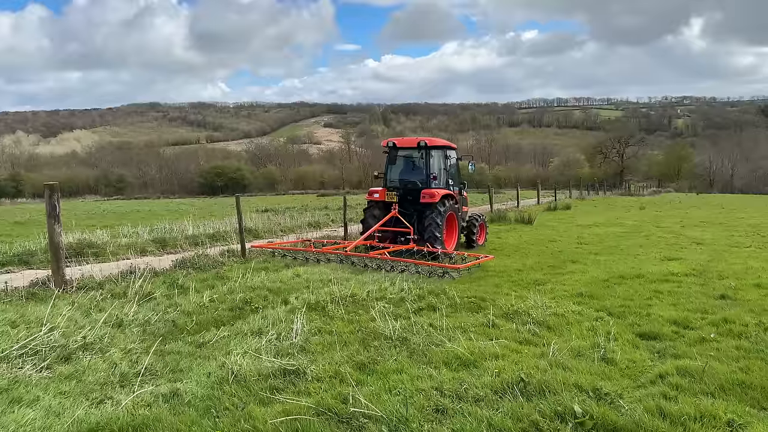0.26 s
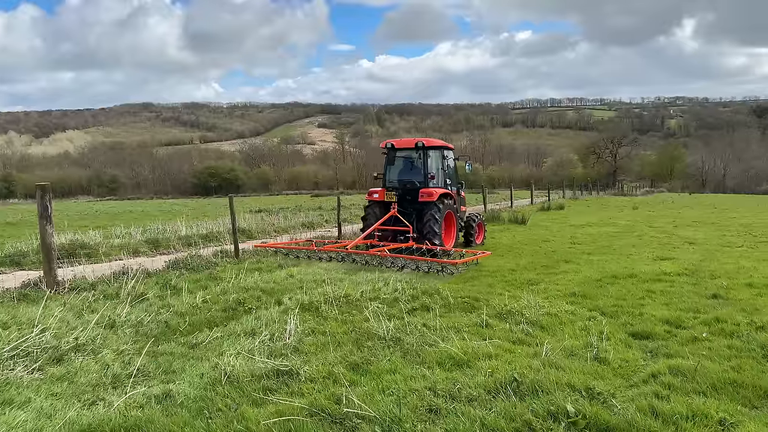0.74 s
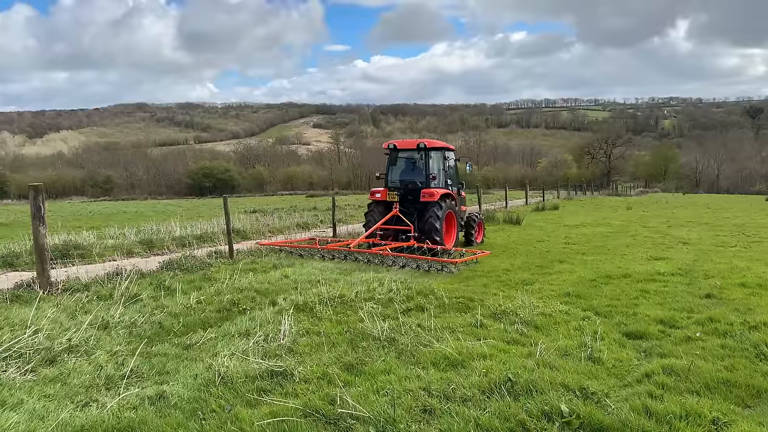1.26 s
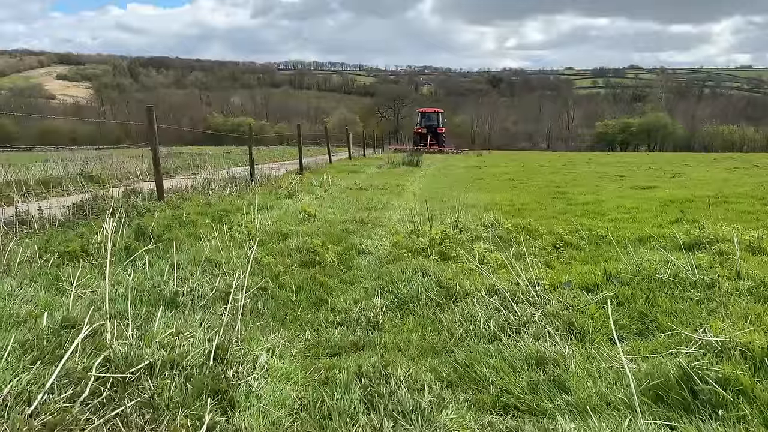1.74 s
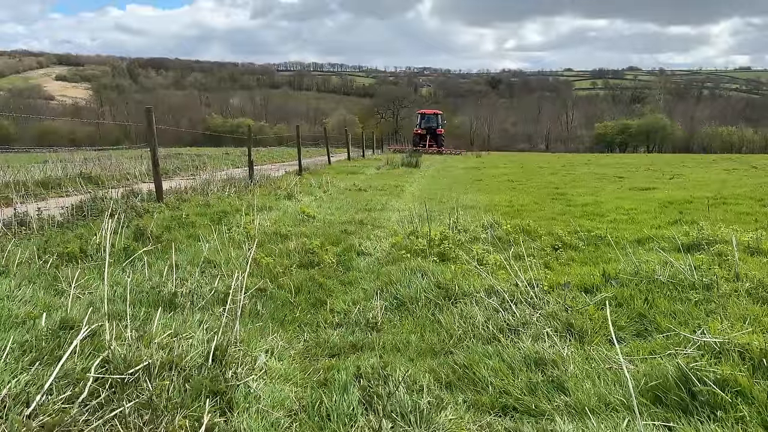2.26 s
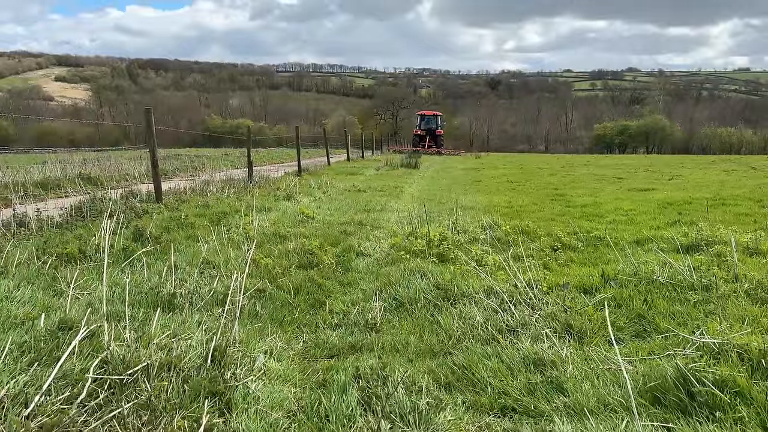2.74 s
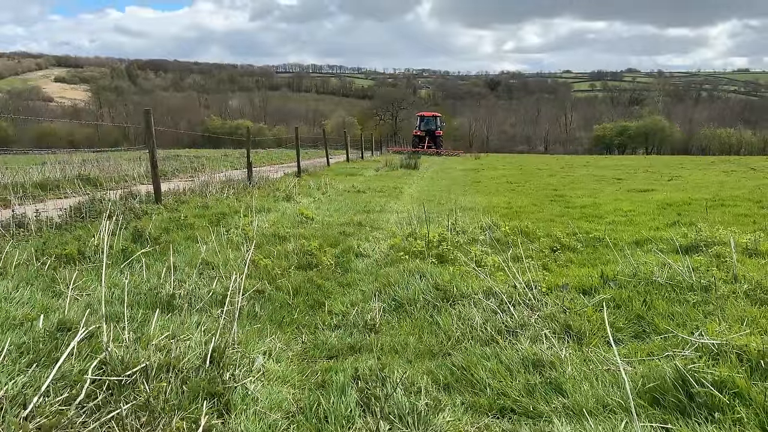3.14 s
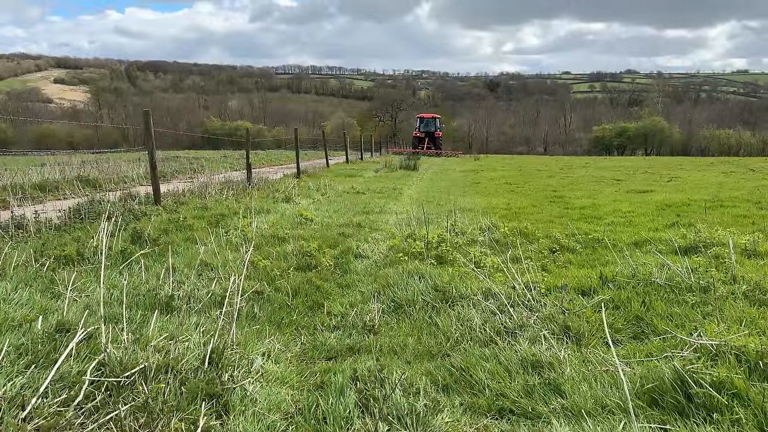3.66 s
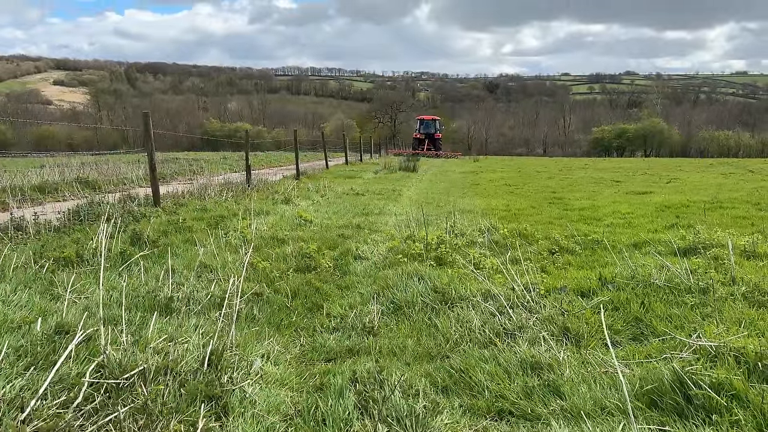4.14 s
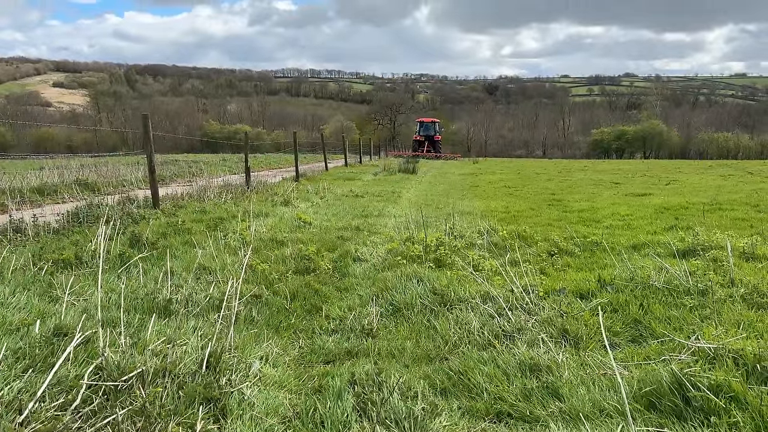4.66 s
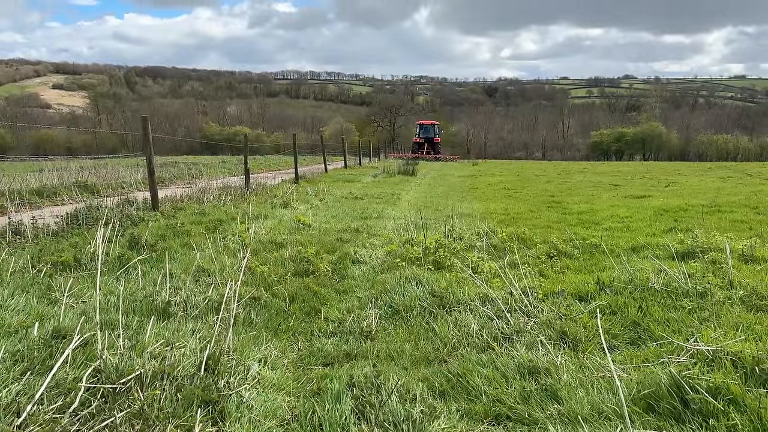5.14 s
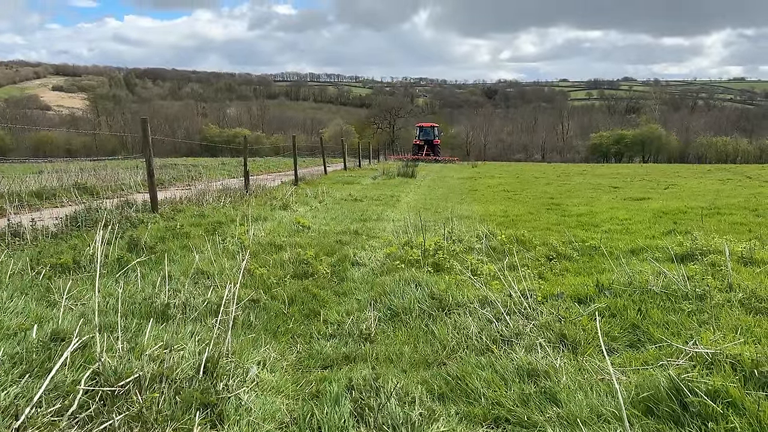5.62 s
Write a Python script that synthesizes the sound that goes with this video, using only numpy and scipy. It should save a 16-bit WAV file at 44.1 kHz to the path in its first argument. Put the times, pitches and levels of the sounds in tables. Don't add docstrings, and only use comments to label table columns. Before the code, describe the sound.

First a near tractor: deep rapid exhaust chug, rapping engine block, faint whine and sporadic harrow clanks. A hard cut moves the handheld microphone far behind it; the engine becomes a soft low purr under airy hiss and a light chain jingle. Wind buffets low, then bent bird notes come late in the dry open field.

```python
import sys
import numpy as np
from scipy import signal
from scipy.fft import rfft, irfft, next_fast_len
from scipy.io import wavfile
from scipy.ndimage import uniform_filter1d

SR = 44100
rng = np.random.default_rng(int(sys.argv[2]) if len(sys.argv) > 2 else 0)


def invert_db(level):
    return 10 ** (np.asarray(level, dtype=float) / 20)


def generate_wav(signal):
    frames = np.transpose(np.atleast_2d(signal))
    scaled = np.clip(frames, -1, 1) * 32767
    pcm = np.round(scaled).astype(np.int16)
    wavfile.write(sys.argv[1], SR, pcm)


N = 259782
CUT_S = 1.7375
HUM_ORDER, BOOM_ORDER = 16, 6
PUFF_AT = 0.165
BODY_FOLLOWS = 0.6

# (time [s], rate [cycles/s])
NEAR_ENGINE_SPEED = [(0, 13.7), (.49, 13.82), (.67, 13.74), (1.25, 13.9), (1.42, 13.84), (1.54, 13.92),
                     (1.64, 14.08), (1.74, 14.16)]
# (time [s], engine load [dB], shaking of the harrow [dB])
NEAR_LOAD = [(0, -1, 7.5), (.1, -0.5, 6), (.3, -1, 5.5), (.5, -1, 11), (.65, -2, 13), (.85, 2, 11.5),
             (1.2, -0.5, -8), (1.45, -3, -17), (1.63, 0.5, 15), (1.74, -6, -13)]
# (frequency [Hz], level [dB], t60 [s])
NEAR_LINK_MODES = [(4740, -0.5, 0.062), (5500, -3.5, 0.033), (6560, -2.5, 0.028), (7080, -4, 0.055),
                   (7560, 3, 0.054), (8000, 4, 0.032), (8700, -13, .04), (9500, -13, 0.064),
                   (10250, -1.5, 0.051), (11500, -15, .03), (13100, -21, .05)]
# (frequency [Hz], level [dB], t60 [s])
FAR_LINK_MODES = [(2494, -7, 0.054), (3050, -8, 0.054), (5720, -3, 0.044), (6445, 0, 0.034),
                  (7120, 0.5, 0.061), (7650, 3.5, 0.089), (7640, -5, 0.035), (8600, -15, .05),
                  (8980, 5.5, 0.06), (10250, -4.5, 0.067), (10530, -10.5, 0.092), (11400, -8, 0.049)]


def evened(x):
    return x / np.sqrt(np.mean(x ** 2) + 1e-20)


def read(points, hz, column=1):
    table = np.transpose(points)
    return np.interp(np.log(hz + 1), np.log(table[0] + 1), table[column])


def follow(t, points):
    return np.interp(t, *np.transpose(points))


def add(mix, s, sound):
    part = mix[..., round(s * SR):][..., :sound.shape[-1]]
    part += sound[..., :part.shape[-1]]


def drift(size, per_s):
    points = uniform_filter1d(rng.standard_normal(400), size=2)
    return evened(np.interp(np.arange(size) * per_s / SR, np.arange(400), points))


def step_down(t, s, fade_s):
    return 0.5 - 0.5 * np.tanh((t - s) / fade_s)


def band(x, lo_hz, hi_hz):
    return signal.sosfiltfilt(signal.butter(4, [lo_hz, hi_hz], "bandpass", fs=SR, output="sos"), x)


def level_in(x, lo_hz, hi_hz):
    return x / band(x, lo_hz, hi_hz).std()


def noise(size, colour, same, patchy_db, peaks=()):
    frames, hz = size // 256 + 5, np.fft.rfftfreq(1024, 1 / SR)
    a, b, c, d, patch = rng.standard_normal((frames, 513, 5)).T
    patch = uniform_filter1d(uniform_filter1d(patch, size=10, axis=0), size=10, axis=1)
    patch = evened(patch)
    lift = np.ones(513)
    for f, width, db in peaks:
        lift += invert_db(db) ** 2 / (1 + (2 * (hz - f) / width) ** 2)
    like = np.clip(read(same, hz), 0, 1)[:, None]
    left = a + 1j * b
    right = like * left + np.sqrt(1 - like ** 2) * (c + 1j * d)
    z = np.array([left, right])
    z *= invert_db(read(colour, hz)[:, None] + patchy_db * patch) * np.sqrt(lift)[:, None]
    return signal.istft(z, nperseg=1024, noverlap=768)[1][:, :size]


def low_noise(size, colour):
    even = size + size % 2
    spectrum = rfft(rng.standard_normal(even)) * invert_db(read(colour, np.fft.rfftfreq(even, 1 / SR)))
    return evened(irfft(spectrum)[:size])


def curves(speed, rows, size, start):
    t = start + np.arange(size) / SR
    s, *columns = np.transpose(rows)
    turns = np.cumsum(follow(t, speed)) / SR
    return t, turns, *(np.interp(t, s, c) for c in columns)


def exhaust(turns, orders, rumble, bass_db, body_db, rumble_db, waver, scatter):
    size = len(turns)
    tones = np.zeros(size)
    for k, db in orders:
        if k in (HUM_ORDER, BOOM_ORDER):
            continue
        place = turns - PUFF_AT + scatter * (k % 3 > 0) * rng.standard_normal()
        level = invert_db(db) * (1 + waver * drift(size, 5.31))
        tones += level * np.cos(2 * np.pi * k * place + waver * drift(size, 3.73))
    x = evened(tones) + invert_db(rumble_db) * low_noise(size, rumble)
    bass, body = evened(band(x, 19, 216.0)), evened(band(x, 219.2, 544))
    return invert_db(bass_db) * bass + invert_db(body_db) * body


def hum(t, rows):
    s, hz, db = np.transpose(rows)
    pitch = uniform_filter1d(np.interp(t, s, hz), size=4000)
    return np.sqrt(2) * invert_db(np.interp(t, s, db)) * np.sin(2 * np.pi * np.cumsum(pitch) / SR)


def boom(t, turns, rows):
    return np.sqrt(2) * invert_db(follow(t, rows)) * np.cos(2 * np.pi * BOOM_ORDER * (turns - PUFF_AT))


def clatter(turns, colour, block, same, knock, decay, uneven_db, lo_hz, hi_hz):
    firing = 3 * turns
    count = firing.astype(int)
    strength = invert_db(uneven_db * (rng.standard_normal(400)[count] + (count % 3 == 0)))
    gate = 1 + knock * strength * np.exp(-uniform_filter1d(firing % 1, size=40) / decay)
    return level_in(noise(len(turns), colour, same, patchy_db=0.74, peaks=block) * gate, lo_hz, hi_hz)


def whine(turns, lines):
    out, size = np.zeros(len(turns)), len(turns)
    for k, db, wobble in lines:
        level = np.sqrt(2) * invert_db(db) * (1 + wobble * drift(size, 11.13))
        out += level * np.cos(2 * np.pi * round(k) * turns + wobble * drift(size, 20.0))
    return out


def ring(links, weights, detune=1):
    t = np.arange(6000) / SR
    modes = np.zeros(6000)
    for (hz, db, t60), w, d in zip(links, weights, detune * np.ones(len(links))):
        modes += w * invert_db(db - 60 * t / t60) * np.sin(2 * np.pi * hz * d * t)
    return (1 - np.exp(-t / 0.0015)) * modes


def chain(turns, links, shakes, per_s, spread_db, tight, tick_db, restless_db, unlike):
    size = len(turns)
    odds = (1 + np.cos(2 * np.pi * shakes * turns)) ** tight * invert_db(2.5 * drift(size, 12.0))
    struck = rng.random(size) < odds / odds.mean() * per_s / SR
    hits = struck * invert_db(spread_db * np.minimum(rng.exponential(1, size), 4))
    which, out = rng.integers(0, 8, size), np.zeros(size)
    for k in range(8):
        weights = rng.standard_normal(len(links))
        sound = ring(links, weights, 1 + unlike * rng.standard_normal(len(links)))
        tick = band(rng.standard_normal(600), 5000, 15500) * np.exp(-np.arange(600) / 90)
        sound[:600] += invert_db(tick_db) * tick
        own_hits = hits * (which == k) * invert_db(restless_db * drift(size, 2.7))
        out += signal.oaconvolve(own_hits, sound)[:size]
    return level_in(out, 5430, 7550)


def piston(t, turns):
    # (frequency [Hz], level [dB], t60 [s])
    modes = [(1795, 0, .07), (1850, -2, .06), (1915, -3, .06), (2520, -12, .02), (3300, -15, .012)]
    # (place in the cycle [0-1], level [dB])
    raps = [(.05, -2), (.3, -4), (.39, 0), (.58, -1), (.73, -5)]
    # (time [s], level [dB])
    rap_level = [(0, -2.5), (.3, 0), (.45, -3.5), (.68, 1.5), (.78, -6.5), (.95, -1), (1.74, -2.5)]
    jitter_s, uneven_db = 0.00043, 1.5
    blows = np.zeros(len(turns))
    for place, db in raps:
        struck = np.flatnonzero(np.diff(np.floor(turns - place)))
        late, hard = rng.standard_normal((len(struck), 2)).T
        at = np.clip(struck + (late * jitter_s * SR).astype(int), 0, len(turns) - 1)
        blows[at] = invert_db(db + uneven_db * hard)
    rung = evened(signal.oaconvolve(blows, ring(modes, np.ones(len(modes))))[:len(turns)])
    return invert_db(-47 + follow(t, rap_level)) * rung


def near_tractor(size):
    # (multiple of the engine cycle, level [dB])
    orders = [(1, -38), (2, -41), (3, -5.5), (4, -20), (5, -10), (6, 3.5), (7, -22.5), (8, -11), (9, 0.5),
              (10, -3.5), (11, 0), (12, -4), (13, -14.5), (14, -15), (15, -2.5), (16, -3), (17, -14),
              (18, -11.5), (19, -15.5), (20, -13.5), (21, -19.5), (22, -12.5), (23, -18), (24, -11.5),
              (25, -22), (26, -28.5), (27, -18.5), (28, -29), (29, -28), (30, -29)]
    # (frequency [Hz], density [dB per Hz])
    rumble = [(22, -53), (38, -23), (134, -3), (188, 1), (219, -8), (259, -30), (325, -18.5), (413, -14.5),
              (620, -19), (810, -53), (1360, -120)]
    # (frequency [Hz], density [dB per Hz])
    colour = [(450, -3.5), (620, 2), (1000, 1.5), (1500, -1.5), (2200, -8.5), (3200, -10), (4600, -19),
              (7600, -18), (9200, -21.5), (10500, -20), (13000, -27.5), (15600, -30), (16000, -82)]
    # (frequency [Hz], width [Hz], level [dB])
    block = [(1814, 120, -6), (1930, 46, -4), (2520, 290, 1), (3890, 300, -1.5)]
    # (frequency [Hz], likeness [0-1])
    same = [(500, 0.98), (900, 0.89), (1300, 0.97), (1800, 0.93), (3500, 0.88), (5500, 0.7), (9200, 1),
            (10500, 1), (13000, 0.8), (16000, .7)]
    # (multiple of the engine cycle, level [dB], wobble [0-1])
    teeth = [(48, -44.5, .1), (54, -63, .4), (72, -58, .4), (96, -64, .5), (140, -64, .4)]
    # (time [s], frequency [Hz], level [dB])
    hum_curve = [(0.0, 227.5, -34), (0.092, 222.7, -40.5), (0.304, 224.2, -42.5), (0.474, 224.0, -35.5),
                 (0.654, 224.0, -44.5), (0.828, 222.9, -37.5), (1.638, 226.5, -41.5), (1.73, 227.1, -35.5),
                 (1.74, 226.6, -54)]
    # (time [s], level [dB])
    boom_curve = [(0.0, -35), (0.028, -40.5), (0.998, -39.5), (1.066, -34), (1.152, -40), (1.196, -40),
                  (1.696, -39), (1.74, -39)]
    # (frequency [Hz], lag [half turns], left-right difference [dB])
    bend = [(600, 0, 0), (800, -.03, 3.5), (1200, -.23, 3), (1500, -.08, 1), (1800, 0, 0)]
    bass_db, body_db, clatter_db, chain_db = -33, -41.5, -44.5, -73.5
    t, turns, load_db, shake_db = curves(NEAR_ENGINE_SPEED, NEAR_LOAD, size, 0)
    x = invert_db(clatter_db + 0.051 * load_db) * clatter(
        turns + 0.283, colour, block, same, knock=0.35, decay=0.4, uneven_db=1.2, lo_hz=1060, hi_hz=3960)
    x += exhaust(turns, orders, rumble, bass_db + load_db, body_db + BODY_FOLLOWS * load_db,
                 rumble_db=-4.5, waver=0.36, scatter=0.016)
    x += whine(turns, teeth) + hum(t, hum_curve) + boom(t, turns, boom_curve)
    x += invert_db(chain_db + shake_db) * chain(
        turns + 0.12, NEAR_LINK_MODES, 0.73, per_s=110, spread_db=0.5, tight=4.4,
        tick_db=4.5, restless_db=4.0, unlike=0.048)
    x += piston(t, turns)
    hz = np.fft.rfftfreq(size, 1 / SR)
    path = invert_db(-read(bend, hz, column=2)) * np.exp(-1j * np.pi * read(bend, hz))
    x[1] = irfft(rfft(x[1]) * path, size)
    return x


def valves(size):
    # (place in the cycle [0-1], low edge [Hz], high edge [Hz], level [dB])
    snaps = [
        (.255, 2200, 4500, -49),
        (.59, 2600, 4500, -48.5),
        (.69, 2200, 3200, -54),
        (.7, 4500, 7600, -54.5),
        (.66, 1000, 1600, -48),
        (.96, 1000, 1600, -48),
    ]
    decay_s, uneven_db = 0.0045, 2.5
    t, turns, load_db, shake_db = curves(NEAR_ENGINE_SPEED, NEAR_LOAD, size, 0)
    out = np.zeros(size)
    for place, lo_hz, hi_hz, db in snaps:
        since_s = (turns - place) % 1 / follow(t, NEAR_ENGINE_SPEED)
        hard_db = uneven_db * rng.standard_normal(40)[np.floor(turns - place).astype(int)]
        fade = uniform_filter1d(np.exp(-since_s / decay_s), size=30)
        out += invert_db(db + hard_db) * fade * evened(band(rng.standard_normal(size), lo_hz, hi_hz))
    return out


def wind():
    # (frequency [Hz], density [dB per Hz])
    colour = [(24, -45), (38, -8), (55, 0), (100, 0), (200, -14), (330, -28), (500, -50)]
    # (time [s], level [dB])
    strength = [(0, -67.5), (1.73, -54), (1.8, -49), (2.2, -64), (2.8, -55), (3.2, -55), (3.5, -69),
                (3.8, -61.5), (4.6, -56), (5.2, -59.5), (5.89, -59)]
    # (time [s], level [dB], frequency [Hz], length [s])
    bumps = [
        (1.876, -38, 75, 0.038),
        (3.993, -18.5, 92, 0.01),
        (4.005, -20, 70.3, 0.036),
        (4.516, -37, 79.6, 0.024),
        (4.581, -32.5, 76.7, 0.045),
        (5.827, -24, 66, 0.016),
    ]
    out = np.array([low_noise(N, colour) * invert_db(0.8 * drift(N, 13.0)) for port in "LR"])
    out *= invert_db(follow(np.arange(N) / SR, strength) + 4)
    for s, db, hz, length in bumps:
        t = np.arange(0, length, 1 / SR)
        swing = np.sin(np.pi * t / length) ** 0.65 * np.sin(2 * np.pi * hz * t + 2.9)
        add(out, s, invert_db(db) * np.outer([1.15, 0.85], swing))
    return out


def clinks(mix):
    # (time [s], frequency [Hz], level [dB])
    near_links = [(.075, 8250, -58), (.09, 7900, -53), (.2, 10300, -54), (.2, 7650, -60), (.515, 8100, -62),
                  (.705, 7850, -57), (.705, 10200, -54), (.775, 8700, -61), (.78, 13100, -62),
                  (.9, 10250, -57), (.92, 7900, -47), (1.29, 7700, -65), (1.512, 9740, -43.5),
                  (1.644, 8060, -46)]
    # (time [s], level [dB])
    far_ticks = [(1.7708, -72), (1.8471, -65), (1.9229, -65), (2.0586, -72), (2.1734, -67), (2.328, -67),
                 (2.3786, -77), (2.4188, -67), (2.6154, -72), (2.768, -72), (2.8977, -70), (3.1127, -69),
                 (3.2804, -63), (3.4859, -79), (3.5926, -75), (3.6291, -75), (3.6804, -70), (3.7423, -79),
                 (3.8067, -72), (3.88, -75), (3.9329, -64), (4.077, -66), (4.1319, -68), (4.2536, -68),
                 (4.3858, -73), (4.4617, -72), (4.6178, -77), (4.6477, -78), (4.7096, -78), (4.7445, -72),
                 (4.8084, -67), (4.8727, -74), (4.9032, -69), (4.9371, -70), (5.0867, -70), (5.2274, -72),
                 (5.2858, -76), (5.3132, -68), (5.7926, -77), (5.8096, -65)]
    t60_s, tick_lift_db, tick_s = 0.076, 1.5, 0.003
    for s, hz, db in near_links:
        add(mix, s, ring([(hz, db, t60_s), (hz * 0.7, db - 3, t60_s)], [1, 1]))
    fade = np.exp(-np.arange(1500) / SR / tick_s)
    puffs = band(rng.standard_normal((len(far_ticks), 1500)), 8000, 15600)
    for (s, db), puff in zip(far_ticks, puffs):
        add(mix, s, invert_db(db + tick_lift_db) * puff * fade)


def knocks(mix):
    # (time [s], level [dB], ring share [0-1])
    strikes = [(0.5186, -48, 0.6), (0.692, -50, 0.3), (0.7943, -47, 0.1), (1.0774, -67, 0.4),
               (1.512, -40, 0.05), (2.1876, -61, 0.3), (2.3281, -70, 0.3), (2.38, -59, 0.5),
               (2.42, -60, 0.2), (2.615, -65, 0.4), (2.895, -52, 0.6), (3.114, -60, 0.2),
               (3.6805, -65, 0.2), (3.939, -57, 0.6), (4.2627, -56, 0.4), (4.9367, -71, 0.5),
               (5.301, -58, 0.6)]
    t = np.arange(3000) / SR
    fade = (1 - np.exp(-t / 0.0011)) * (np.exp(-t / 0.0037) + invert_db(-8) * np.exp(-t / 0.02))
    for s, db, share in strikes:
        links = NEAR_LINK_MODES if s < CUT_S else FAR_LINK_MODES
        sound = share * 0.38 * ring(links, rng.standard_normal(len(links)))
        spray = rng.standard_normal(3000)
        sound[:3000] += (band(spray, 5500, 11500) + invert_db(-4) * band(spray, 11500, 15600)) * fade
        add(mix, s - 0.001, invert_db(db + 2.5) * sound)


def drawbar(t, turns):
    # (start [s], length [s], frequency [Hz], level [dB])
    rough_ground = [(1.6, .4, 1430, -84), (1.6, 0.45, 6250, -68), (1.6, 0.37, 5500, -70),
                    (1.6, 0.74, 7120, -78), (1.6, 0.62, 8000, -69), (1.6, .75, 8980, -75),
                    (2.2, .7, 5900, -78), (2.3, 1, 5700, -77), (2.55, .5, 5500, -77), (2.4, .55, 7100, -76),
                    (3, 1.4, 1487, -74), (3.15, .95, 3030, -69), (3.2, .75, 2530, -74),
                    (3.22, 1.3, 5940, -66), (3.22, .9, 4830, -73), (3.22, .75, 7000, -73),
                    (3.2, 2.35, 8980, -75), (3.9, .8, 6270, -70), (4.15, .5, 8000, -75),
                    (4.292, 0.85, 5800, -71), (5.35, 0.35, 4770, -75), (4.398, 1.26, 6980, -75.5),
                    (4.751, 0.44, 6200, -70), (4.846, 0.87, 5890, -70), (4.851, 1, 2974, -73.5),
                    (2.411, 0.39, 10250, -85), (3.101, 1.3, 10100, -75), (4.606, 0.81, 10040, -81)]
    t60_s, edge, spread, wander = 0.11, 0.2, 0.008, 0.003
    odds = (1 + np.cos(4 * np.pi * (turns + 0.1))) * 1500 / SR
    out = np.zeros(len(t))
    decay = np.exp(-np.log(1000) / t60_s / SR)
    for s, length, hz, db in rough_ground:
        on = (t > s) & (t < s + length)
        size = on.sum()
        taps = (rng.random(size) < odds[on]) * rng.standard_normal(size)
        angle = 2j * np.pi * np.cumsum(hz * (1 + wander * drift(size, 3.9))) / SR
        sung = np.zeros(size)
        for turn, w in [(np.exp(angle), 1), (np.exp((1 + spread) * angle), 0.5)]:
            sung += w * (turn * signal.lfilter([1], [1, -decay], taps * turn.conj())).real
        out[on] += invert_db(db) * np.sin(np.pi * (t[on] - s) / length) ** edge * evened(sung)
    return out


def far_tractor(size):
    # (time [s], rate [cycles/s])
    speed = [(1.74, 15.7), (2.8, 15.58), (3.8, 15.54), (4.2, 15.62), (4.8, 15.64), (5.2, 15.55),
             (5.89, 15.52)]
    # (time [s], engine load [dB], shaking of the harrow [dB], treble carried by the air [dB])
    work = [(1.74, 8, 2.5, 3.5), (2.1, -1, 0, 2.5), (2.25, 0, 5.5, 1), (2.31, -0.5, -10, -0.5),
            (2.37, 1.5, -2, 2), (2.6, 1, -3.5, 0.5), (2.9, -0.5, 1, 2.5), (3.15, 1, -1.5, 1.5),
            (3.5, -1, 0, 2), (3.9, 1, 1, 2.5), (4.25, -0.5, 0, 2.3), (4.55, 0.5, 0.5, 0.5), (5, -1, 5, 1),
            (5.3, -2.5, -1, -0.5), (5.53, -0.5, -3.5, 0.4), (5.6, -3, -8.5, -1), (5.72, -2.5, 1, -0.5),
            (5.89, 0.5, -9.5, -1.5)]
    # (multiple of the engine cycle, level [dB])
    orders = [(1, -44.5), (2, -25), (3, -8.5), (4, -7.5), (5, -20.5), (6, 0), (7, -2.5), (8, -9.5),
              (9, -1.5), (10, 1), (11, -4), (12, -4.5), (13, -6.5), (14, -17), (15, -14.5), (16, -4),
              (17, -19), (18, -12), (19, -15), (20, -24.5), (21, -31.5), (22, -22.5), (23, -23), (24, -10),
              (25, -20.5), (26, -16), (27, -19), (28, -22.5), (29, -17.5), (30, -22), (31, -26.5),
              (32, -28)]
    # (frequency [Hz], density [dB per Hz])
    rumble = [(22, -58), (40, -25), (146, -5.5), (196, -0.5), (219, -15.5), (243, -12.5), (276, -17.5),
              (378, -13), (620, -18.5), (810, -57.5), (1360, -120)]
    # (frequency [Hz], density [dB per Hz])
    colour = [(450, -3), (620, 2.5), (1000, -1), (1400, -7), (2200, -7.5), (3400, -9.5), (4500, -15.5),
              (6000, -10.5), (8000, -25.5), (10000, -19.5), (11500, -25.5), (12800, -30), (15600, -53),
              (16000, -81)]
    # (frequency [Hz], width [Hz], level [dB])
    block = [(1450, 48, 3.5), (3020, 34, 2), (2500, 33, -20)]
    # (frequency [Hz], likeness [0-1])
    same = [(500, 0.39), (750, 0.21), (1100, 0.053), (1500, 0.82), (1900, 0.89), (3500, 0.82), (5500, 0.58),
            (9200, 0.84), (10500, 0.84), (13000, 0.44), (16000, .7)]
    # (multiple of the engine cycle, level [dB], wobble [0-1])
    teeth = [(36, -70, 0.38), (48, -66.5, 0.15)]
    # (time [s], frequency [Hz], level [dB])
    hum_curve = [(1.76, 248.2, -47), (1.77, 248.7, -48), (1.94, 251.1, -57), (2.18, 251.5, -47),
                 (2.71, 251.8, -45.5), (2.93, 250.5, -50.5), (3.29, 249.6, -46), (3.47, 249.6, -50),
                 (3.74, 249.9, -45.5), (4.52, 252.4, -48.5), (4.8, 252.2, -44.5), (5.08, 251.9, -52.5),
                 (5.27, 250.9, -45), (5.76, 251.0, -50), (5.88, 248.4, -47), (5.89, 248.2, -40)]
    # (time [s], level [dB])
    boom_curve = [(1.76, -57), (1.78, -70), (1.9, -46), (1.98, -67), (2.01, -53), (2.22, -63), (2.36, -48),
                  (2.43, -57), (2.64, -42.5), (3.27, -47), (3.97, -44), (4.01, -38), (4.08, -43.5),
                  (5.57, -46), (5.85, -40.5), (5.89, -51)]
    bass_db, body_db, clatter_db, chain_db = -38.5, -48.5, -65, -70
    t, turns, load_db, shake_db, carry_db = curves(speed, work, size, CUT_S)
    x = invert_db(clatter_db + carry_db) * clatter(
        turns + 0.1, colour, block, same, knock=0.5, decay=0.45, uneven_db=1.5, lo_hz=855, hi_hz=1880)
    treble_db = 0.38 * carry_db + 1.9 * drift(size, 11.15)
    x += (invert_db(treble_db) - 1) * band(x, 4000, 16000)
    bass_db = bass_db + load_db - 11.5 * step_down(t, 2.18, 0.02)
    body_db = body_db + BODY_FOLLOWS * load_db - 3 * step_down(t, 1.91, 0.12)
    pipe = exhaust(turns, orders, rumble, bass_db, body_db, rumble_db=-3.5, waver=0.28, scatter=0.102)
    pipe += hum(t, hum_curve)
    x += pipe + (invert_db(-6.5 * step_down(t, 2.63, 0.13)) - 1) * band(pipe, 13, 148)
    x += boom(t, turns, boom_curve)
    x += invert_db(-5 * step_down(t, 3.5, 0.088)) * whine(turns, teeth)
    x += invert_db(chain_db + shake_db) * chain(
        turns + 0.1, FAR_LINK_MODES, 2, per_s=700, spread_db=2.0, tight=1.3,
        tick_db=-2, restless_db=2.0, unlike=0.006)
    x += drawbar(t, turns)
    gust_db = 5 * (drift(size, 10.0) - 1) + 0.8 * shake_db
    return x + (invert_db(gust_db) - 1) * band(x, 11800, 16000)


def whistle(mix, start, hz, level, sides):
    level = level * (1 + 0.17 * drift(len(hz), 60))
    add(mix, start, np.outer(sides, np.sqrt(2) * level * np.sin(2 * np.pi * np.cumsum(hz) / SR)))


def long_note(rows):
    s, hz, db = np.transpose(rows)
    t = np.arange(s[0], s[-1], 1 / SR)
    ends = np.clip(np.minimum(t - s[0], s[-1] - t) / 0.006, 0, 1)
    return s[0], uniform_filter1d(np.interp(t, s, hz), size=200), invert_db(np.interp(t, s, db)) * ends


def arch(start, length, first_hz, last_hz, db):
    u = np.arange(0, length, 1 / SR) / length
    bow = np.sin(np.pi * u ** 0.86)
    hz = (first_hz + (last_hz - first_hz) * u) * (1 + 0.14 * bow ** 0.47)
    return start, hz, invert_db(db) * np.sin(np.pi * u) ** 1.1


def slide(start, length, first_hz, last_hz, db):
    u = np.arange(0, length, 1 / SR) / length
    bend = 0.5 - 0.5 * np.cos(np.pi * u ** 0.66)
    return start, first_hz + (last_hz - first_hz) * bend, invert_db(db + 5 * u) * np.sin(np.pi * u ** 0.68)


def birds(mix):
    # (time [s], frequency [Hz], level [dB])
    bent_notes = [
        [(4.812, 2310, -70), (4.83, 2370, -64), (4.853, 2490, -60), (4.872, 2500, -65), (4.885, 2480, -76)],
        [(4.895, 2480, -72), (4.941, 2490, -59), (4.975, 2400, -62), (5, 2330, -61), (5.025, 2320, -64),
         (5.065, 2160, -58.5), (5.084, 2080, -74)],
        [(5.58, 2080, -72), (5.6, 2290, -64), (5.62, 2460, -58), (5.638, 2490, -55), (5.655, 2420, -60),
         (5.672, 2270, -68), (5.7, 2190, -69), (5.72, 2130, -74)],
        [(5.652, 3740, -76), (5.68, 3620, -64), (5.7, 3470, -59), (5.725, 3370, -59), (5.75, 3180, -61),
         (5.775, 3030, -57.5), (5.81, 2900, -66), (5.85, 2770, -69), (5.89, 2690, -70)],
    ]
    # (start [s], length [s], first frequency [Hz], last frequency [Hz], level [dB])
    side_arches = [
        (5.63, .125, 1780, 1680, -75),
        (5.81, .16, 1800, 1850, -74),
    ]
    # (start [s], length [s], first frequency [Hz], last frequency [Hz], level [dB])
    low_slides = [
        (5.75, .13, 1620, 1580, -72),
    ]
    for rows in bent_notes:
        whistle(mix, *long_note(rows), [1.1, 0.9])
    for row in side_arches:
        whistle(mix, *arch(*row), [0.5, 1.5])
    for row in low_slides:
        whistle(mix, *slide(*row), [1.1, 0.9])


def scene():
    cut = round(CUT_S * SR)
    mix = np.hstack([near_tractor(cut), far_tractor(N - cut)])
    add(mix, 0, valves(cut))
    mix += wind()
    clinks(mix)
    knocks(mix)
    birds(mix)
    return mix


def band_limit(x):
    return signal.sosfilt(signal.butter(12, 15770, fs=SR, output="sos"), x)


def record(dry):
    # (frequency [Hz], lag [half turns])
    port_lag = [(2200, 0.001), (3000, 0.054), (4300, 0.063), (5200, 0.39), (6600, 0.29), (7200, 0.33),
                (7750, 0.59), (9300, 0.53), (9750, 0.78), (12000, 0.58), (14000, 0.5), (15800, .08)]
    # (frequency [Hz], level [dB])
    keep_sum = [(7550, 0), (7800, -60), (9300, -60), (9600, 0)]
    # (frequency [Hz], level [dB])
    keep_difference = [(1600, 0), (1850, -25), (2200, -25), (2500, 0), (4300, 0), (4700, -12), (5300, -40),
                       (6600, -40), (6900, 0)]
    size = next_fast_len(N + 4096)
    hz = np.fft.rfftfreq(size, 1 / SR)
    left, right = rfft(dry, size)
    right = right * np.exp(-1j * np.pi * read(port_lag, hz))
    both = (left + right) * invert_db(read(keep_sum, hz))
    apart = (left - right) * invert_db(read(keep_difference, hz))
    mix = irfft(np.array([both + apart, both - apart]) / 2, size)[:, :N]
    return band_limit(mix)


dry = scene()
out = record(dry)
generate_wav(out)
```